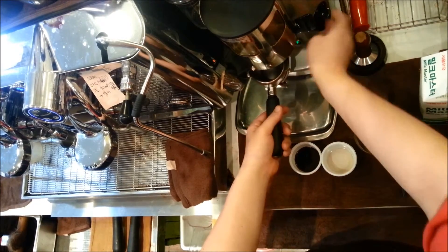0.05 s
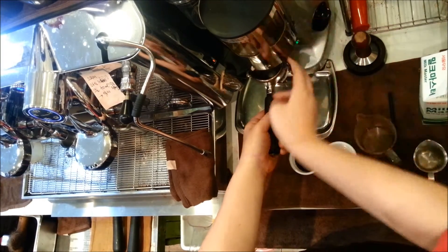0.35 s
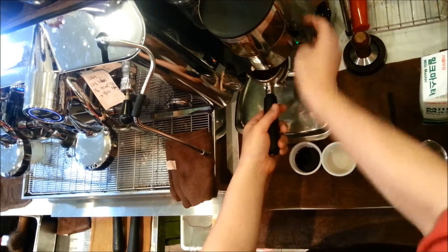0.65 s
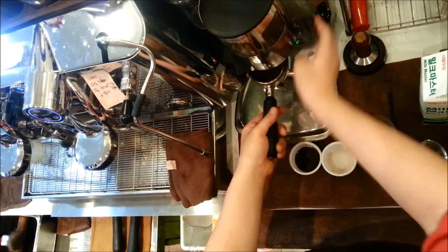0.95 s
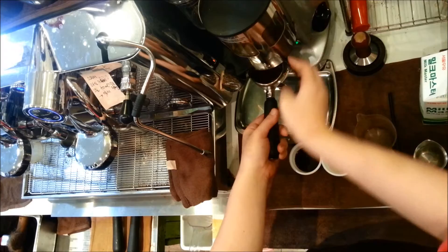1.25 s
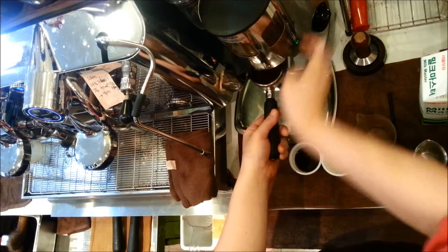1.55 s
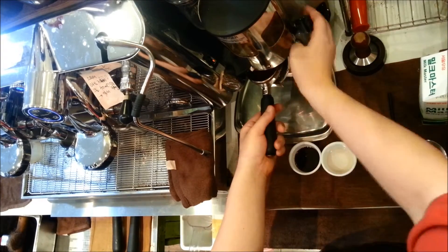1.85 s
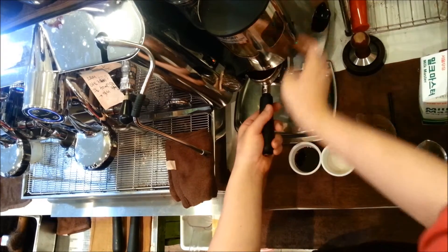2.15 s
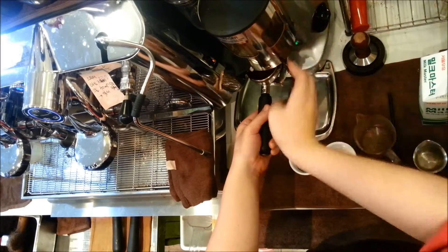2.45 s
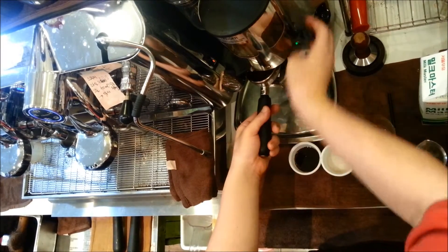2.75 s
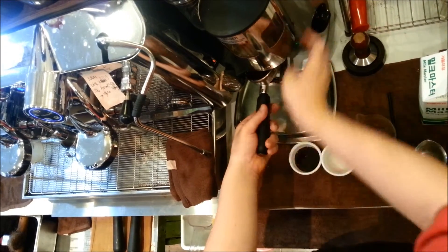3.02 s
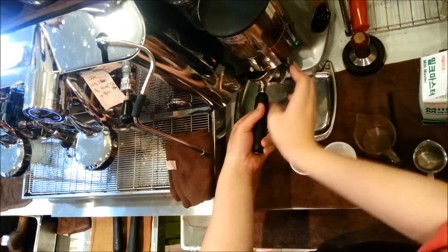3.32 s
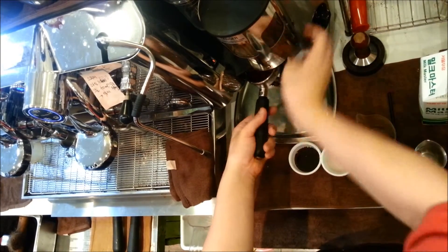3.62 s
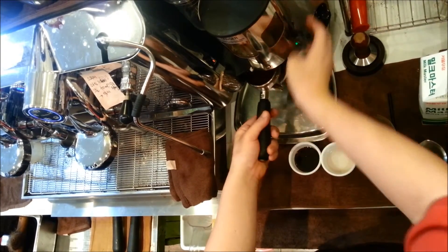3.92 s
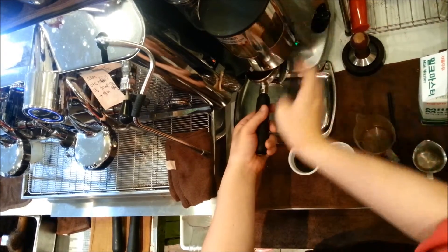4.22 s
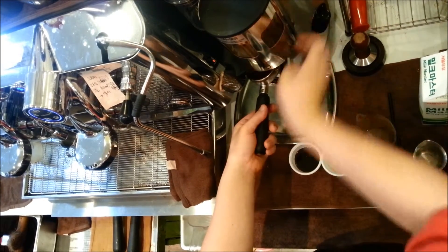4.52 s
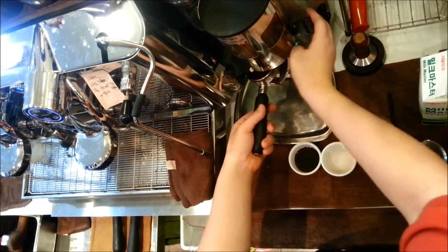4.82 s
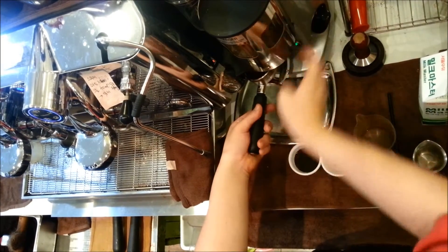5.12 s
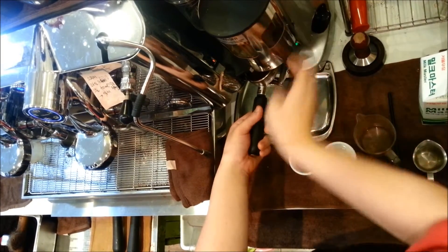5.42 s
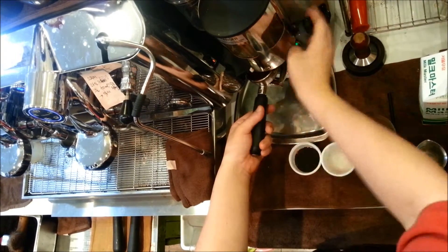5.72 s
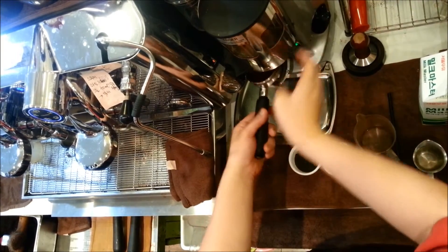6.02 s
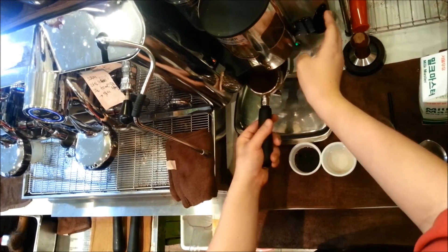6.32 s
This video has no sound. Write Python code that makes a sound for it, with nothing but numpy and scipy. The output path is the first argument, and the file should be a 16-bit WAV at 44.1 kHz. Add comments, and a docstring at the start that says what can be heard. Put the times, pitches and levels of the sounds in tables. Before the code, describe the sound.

With a dull knock, an electric coffee grinder starts suddenly and runs on, a high, slightly wavering motor whine over the dense rasp of beans being crushed. Its dosing lever is pulled about two and a half times a second, each pull a hard, briefly ringing clack with a short hiss of grounds. Softer knocks sometimes follow as the lever returns. The microphones are close, at a cafe counter, and the clacks overload them.

```python
"""At a coffee counter, an espresso grinder runs close by. Its motor whines, unsteady under load,
while the burrs (the toothed grinding discs) crush beans. A hand pulls the lever of the doser, the
chamber that hands out the coffee, about 2.4 times a second. Each pull ends in a hard clack and a
spill of grounds; after some pulls the lever knocks more softly on its way back.
The clacks overload the microphones."""
import sys
import numpy as np
from scipy import signal
from scipy.fft import rfft, irfft, next_fast_len
from scipy.io import wavfile

SR = 44100
rng = np.random.default_rng(int(sys.argv[2]) if len(sys.argv) > 2 else 0)


def persist_wave(psi):
    """Save psi, clipped to +-1, as 16-bit WAV."""
    counts = np.round(np.clip(psi, -1, 1) * 32767).astype(np.int16)
    wavfile.write(sys.argv[1], SR, np.atleast_2d(counts).T)


N = 289558
T = np.arange(N) / SR


# the motor's speed sways with the feed of beans: (time [s], whine pitch [Hz])
MOTOR_PITCH = [(0.13, 1629), (1.01, 1639), (1.65, 1636), (1.81, 1642), (1.89, 1635), (2.21, 1641),
               (2.45, 1632), (2.77, 1640), (3.33, 1633), (3.41, 1638), (3.65, 1632), (3.73, 1637),
               (4.61, 1633), (5.33, 1643), (5.89, 1633), (6.55, 1641)]
# tones of the whine: (multiple of the pitch, level [dB], left minus right [dB], roughness [0-1])
WHINE_TONES = [(1, 0.5, -11, 0.6), (2, -9.5, -8, 0.71), (3, -22, 12, 0.36)]
# the motor's pulsing pull adds a few tones beside the whine:
# (distance from the pitch [multiples of the mains frequency], level [dB], left minus right [dB])
SIDE_TONES = [(-2, -11, 3), (-1, -14.5, 5), (2, -15, -3)]

def motor_whine(level_db=-16, surge_db=3.5, jitter_hz=4, flutter_db=5, sway_db=0.87, mains_hz=60):
    """The motor sings: beans jolt its speed and strength, and the housing scatters part of the tone."""
    start_s, attack_s = 0.12, 0.007
    pitch_hz = np.interp(T, *np.transpose(MOTOR_PITCH)) + jitter_hz * wander(18.9)
    phase = 2 * np.pi * np.cumsum(pitch_hz) / SR
    surge = swell(start_s, attack_s, hold_s=0.21, release_s=0.057)
    unrest = 1 - 0.5 * surge  # the tone is purer during the opening surge
    snags = np.logaddexp(0, 2 * wander(25)) / 2  # a snagging bean only ever chokes the tone
    jolts_db = sway_db * wander(3) - flutter_db * snags
    strength = amp(level_db + surge_db * surge + jolts_db * unrest)
    strength *= np.clip((T - start_s) / attack_s, 0, 1)
    out = np.zeros((2, N))
    for multiple, db, lean_db, rough in WHINE_TONES:
        scatter = np.array([wander(15) + 1j * wander(15) for _ in range(2)]) / np.sqrt(2)
        pure = np.sqrt(1 - rough ** 2) * pan(lean_db)
        scattered = rough * unrest * scatter * pan(lean_db / 2)
        out += amp(db) * ((pure + scattered) * np.exp(1j * multiple * phase)).real
    for offset, db, lean_db in SIDE_TONES:
        side_phase = phase + 2 * np.pi * offset * mains_hz * T + 0.93 * wander(12)
        out += amp(db) * unrest * pan(lean_db) * np.cos(side_phase)
    return np.sqrt(2) * strength * out


# the noise of beans being crushed, from low to high: (frequency [Hz], level [dB])
CRUSH_SPECTRUM = [(130, -73), (200, -25), (270, -12.5), (430, -0.5), (570, -2.5), (690, -11), (930, 4.5),
                  (1200, 1), (1700, 8.5), (2500, 1), (3400, 1), (4450, 3), (5400, -6.5), (10000, -7),
                  (16000, -22)]
# pitches that the housing boosts or dampens: (frequency [Hz], width [Hz], boost [dB])
HOUSING_RESONANCES = [(280, 14, 6), (355, 14, 4), (465, 30, 4), (500, 18, 7), (535, 25, -6), (752, 18, 9),
                      (825, 20, 5), (900, 22, 5), (985, 18, 4), (1015, 18, 6), (1165, 60, -3),
                      (1465, 26, 5), (1585, 20, 6), (1690, 40, -3), (1775, 36, 5), (1900, 28, 4),
                      (2090, 32, 8), (2187, 36, 9), (2710, 70, -3), (4100, 28, 5), (4478, 55, 8),
                      (4796, 30, 9), (5060, 32, 5)]

def crushing_beans(level_db=-16.5, bite_db=4, snaps_per_s=2500, snap_db=-6, stir_db=5.5, settle_s=0.083):
    """Bits of bean rub and snap between the burrs and sound through the housing; the first bite is louder."""
    bite_s, attack_s = 0.066, 0.016
    bite = swell(bite_s, attack_s, hold_s=0.029, release_s=0.062)
    idle = np.clip(1 - (T - bite_s) / attack_s, 0, 1)  # 1 before the bite, 0 after
    snaps = (rng.random(N) < snaps_per_s / SR) * rng.exponential(1, N)
    snaps = unit(signal.lfilter([1], [1, -np.exp(-1 / (0.0003 * SR))], snaps))  # each fades in 0.3 ms
    noise = unit(rng.standard_normal((2, N)) * np.hypot(1, amp(snap_db) * snaps))
    noise *= amp(level_db + 0.5 * idle + bite_db * bite + 1.2 * wander(20))
    sound = colour(noise, CRUSH_SPECTRUM, HOUSING_RESONANCES)
    # the burr edges rasp most in the bite, building up more slowly and fading later
    zing = swell(bite_s, attack_s=0.037, hold_s=0.033, release_s=0.077)
    rasp_db = -4.5 * idle + 3.5 * (1 - idle) + 4 * zing + wander(4)
    sound = boost_band(sound, [4300, 4750], rasp_db)
    # each pull stirs the grounds, which lifts the hollow middle of the sound until they settle
    stir = sum((T > s) * np.exp(-abs(T - s) / settle_s) for s, *_ in LEVER_CLACKS)
    middle_db = -1.2 + stir_db * stir + wander(2)
    return boost_band(sound, [800, 1450], middle_db)


def doser():
    """The doser's small parts give off no bass; the low end comes from the counter."""
    small_parts = lever_clacks() + lever_returns() + spilling_grounds()
    return cut(small_parts, "highpass", hz=270, order=4) + counter_thump()


# the lever hits its stop: (time [s], crack [dB], chamber ring [dB], thump [dB], bounce [dB])
LEVER_CLACKS = [(0.6944, -9.5, -3.5, -64.5, -3), (1.109, -6, -2, -31, -24), (1.5441, -10.5, -2.5, -23, -8),
                (1.9657, -8.5, -3.5, -27, -2), (2.377, -5, -2, -20, -6), (2.8106, -9.5, -6, -54, -4),
                (3.225, -6.5, -3.5, -42, -3), (3.6516, -6, -0.5, -55.5, -11),
                (4.1033, -13.5, -6.5, -30, -3), (4.4654, -4, -4.5, -52, -20), (4.9401, -6.5, -5, -45, -11),
                (5.3504, -8.5, -6.5, -37, -1), (5.7957, -7.5, -4.5, -32, -2), (6.3064, -8, -7, -31, 2.5)]
# the sharp crack of a lever blow, from low to high: (frequency [Hz], level [dB])
CRACK_SPECTRUM = [(100, -40), (250, -20), (420, -6), (650, -7), (950, 1), (1500, 0), (2400, -1), (3500, -3),
                  (4100, 2), (5500, -1), (8000, -5.5), (16000, -10)]

def lever_clacks(crack_gain_db=10, ring_gain_db=-3):
    """The lever slams into its stop with a crack and sets the chamber ringing."""
    cracks, rings = np.zeros((2, 2, N))
    for s, crack_db, ring_db, _, bounce_db in LEVER_CLACKS:
        shape, lead_s = lever_blow(bounce_db)
        add(cracks, s - lead_s, amp(crack_db + crack_gain_db) * shape)
        add(rings, s, amp(ring_db + ring_gain_db) * chamber_ring())
    return colour(cracks * grit(), CRACK_SPECTRUM) + rings


# the lever swings back: (time [s], crack [dB], chamber ring [dB])
LEVER_RETURNS = [(0.4734, -12, -2.5), (2.59, -15, -38), (3.4258, -13.5, -13.5), (4.24, -10, -5),
                 (4.7212, -16, -20), (5.1317, -12.5, -10), (5.5816, -16, -12), (6.0175, -12, -9)]

def lever_returns(crack_gain_db=3, ring_gain_db=-9):
    """The returning lever strikes a softer, duller blow that also rings the chamber."""
    cracks, rings = np.zeros((2, 2, N))
    for s, crack_db, ring_db in LEVER_RETURNS:
        shape, lead_s = lever_blow(bounce_db=-6)
        add(cracks, s - lead_s, amp(crack_db + crack_gain_db) * shape)
        add(rings, s, amp(ring_db + ring_gain_db) * chamber_ring())
    dull = cut(cracks * grit(), "lowpass", hz=7000, order=1)
    return colour(dull, CRACK_SPECTRUM) + rings


def lever_blow(bounce_db, catch_db=-18, catch_s=0.004, fade_s=0.007, bounce_s=0.008):
    """One blow's strength over time, and its lead-in: a latch catches, the lever hits, bounces, rattles."""
    t = np.arange(SR // 3) / SR - catch_s
    strike = np.exp(-t / fade_s)
    bounce = amp(bounce_db) * (t > bounce_s) * np.exp(-abs(t - bounce_s) / fade_s)
    rattle = amp(-15) * np.exp(-t / 0.047)
    together = np.sqrt(strike ** 2 + bounce ** 2 + rattle ** 2)
    return np.where(t < 0, amp(catch_db), together)[None], catch_s


# the notes of the doser chamber: (pitch [Hz], level [dB], time to fade by 60 dB [s])
CHAMBER_NOTES = [(400, -15, .06), (490, -12, .08), (750, -11, .09), (825, -6, .09), (905, 0, .075),
                 (1010, 2, .07), (1090, -5, .06), (1210, -8, .05), (1340, -5, .05), (1470, -2, .06),
                 (1790, -1, .05), (2435, -5, .06), (3950, -3, .02)]

def chamber_ring(uneven_db=1.5, attack_s=0.0016):
    """The struck chamber rings, a little differently each time and at each microphone."""
    t = np.arange(SR // 5) / SR
    out = np.zeros((2, len(t)))
    for hz, db, fade_s in CHAMBER_NOTES:
        size, turn, skew = rng.standard_normal(3)
        phase = 2 * np.pi * (hz * t + turn) + skew * np.array([[0.25], [-0.25]])
        out += amp(db + uneven_db * size - 60 * t / fade_s) * np.sin(phase)
    return out * (1 - np.exp(-t / attack_s))


# the hiss of sliding grounds, from low to high: (frequency [Hz], level [dB])
GROUNDS_SPECTRUM = [(1000, -30), (3000, 10), (6500, 39.5), (10000, 18), (16000, 28.5)]

def spilling_grounds(level_db=-26, peak_s=0.031):
    """Grounds slide out with a short hiss after each clack."""
    t = np.arange(SR // 2)[None] / SR
    spill = amp(level_db) * t / peak_s * np.exp(1 - t / peak_s)
    spills = np.zeros((1, N))
    for s, *_ in LEVER_CLACKS:
        add(spills, s, spill)
    return colour(spills * grit(), GROUNDS_SPECTRUM)


def counter_thump(gain_db=5, fade_s=0.007):
    """Each clack gives the counter a short push, heard as a low thump."""
    push = np.exp(-np.arange(SR // 2)[None] / SR / fade_s)
    thumps = np.zeros((1, N))
    for s, _, _, thump_db, _ in LEVER_CLACKS:
        add(thumps, s, amp(thump_db + gain_db) * push)
    rumble = cut(rng.standard_normal((2, N)), "lowpass", hz=120, order=2)
    return thumps * unit(rumble)


def body_knock(start_s=0.047, hz=450, level_db=-11, fade_s=0.08):
    """The grinder's body gives one dull knock just before the burrs bite."""
    t = np.maximum(T - start_s, 0)
    rise = (1 - np.exp(-t * hz)) ** 2  # builds up over about one cycle
    return amp(level_db - 60 * t / fade_s) * rise * np.sin(2 * np.pi * hz * t)


def grit(uneven_db=2):
    """Grainy noise: metal parts and grounds touch in many tiny separate contacts."""
    return unit(rng.standard_normal((2, N)) * amp(uneven_db * wander(300)))


# how alike the two microphones sound: (frequency [Hz], likeness [1 same, 0 unrelated, -1 opposite])
MIC_LIKENESS = [(250, 0.78), (500, 0.82), (1000, 0.53), (1600, 0.18), (2500, 0.15), (5000, 0),
                (14000, -0.5)]
# which microphone is louder: (frequency [Hz], left minus right [dB])
MIC_BALANCE = [(400, 0), (1000, -1), (1700, -2), (2200, -1), (2800, 3), (4200, 4), (8000, 1.5), (14000, 5)]

def colour(noise_pair, spectrum, peaks=()):
    """Gives two unrelated noises an object's tone colour and shares them between the microphones."""
    hz = np.fft.rfftfreq(8192, 1 / SR)
    peaks_db = sum(boost / (1 + (2 * (hz - f) / width) ** 2) for f, width, boost in peaks)
    log_gain = np.log(unit(amp(curve_at(spectrum, hz) + peaks_db)))
    # build a filter that rings only after it is struck (minimum phase)
    mirrored = np.concatenate([log_gain, log_gain[-2:0:-1]])
    gain = np.exp(signal.hilbert(mirrored).conj())[:len(hz)]
    response = irfft(gain)[:len(hz)]
    first, second = rfft(signal.oaconvolve(noise_pair, response[None], axes=1), 2 * N)
    hz = np.fft.rfftfreq(2 * N, 1 / SR)
    same = curve_at(MIC_LIKENESS, hz)
    lean = amp(curve_at(MIC_BALANCE, hz) / 2)
    left = first * lean
    right = (same * first + np.sqrt(1 - same ** 2) * second) / lean
    return irfft(np.array([left, right]))[:, :N]


def curve_at(points, hz):
    """Joins the points by straight lines on a log-frequency axis."""
    f, value = np.transpose(points)
    return np.interp(np.log(hz + 1), np.log(f + 1), value)


def wander(hz):
    """A random wobble of typical size 1, mostly slower than the given rate."""
    size = next_fast_len(N, True)
    f = np.fft.rfftfreq(size, 1 / SR)
    fade = 1 / np.sqrt((1 + (f / hz) ** 2) * (1 + (f / (10 * hz)) ** 4))
    return unit(irfft(rfft(rng.standard_normal(size)) * fade, size)[:N])


def swell(start_s, attack_s, hold_s, release_s):
    """Rises from 0 to 1, holds, and falls back."""
    return np.interp(T, start_s + np.cumsum([0, attack_s, hold_s, release_s]), [0, 1, 1, 0])


def boost_band(sound, band_hz, db):
    band = signal.sosfiltfilt(signal.butter(2, band_hz, "bandpass", fs=SR, output="sos"), sound)
    return sound + band * (amp(db) - 1)


def cut(sound, kind, hz, order):
    return signal.sosfilt(signal.butter(order, hz, kind, fs=SR, output="sos"), sound)


def add(mix, s, sound):
    part = mix[:, max(round(s * SR), 0):][:, :sound.shape[1]]
    part += sound[:, :part.shape[1]]


def amp(db):
    return 10 ** (np.asarray(db) / 20)


def unit(x):
    return x / np.sqrt(np.mean(x ** 2) + 1e-20)


def pan(db):
    return amp(np.array([[db], [-db]]) / 2)


def scene():
    return motor_whine() + crushing_beans() + doser() + body_knock()


def record(dry, limit_db=-11, share=0.17, attack_s=0.011, recovery_db_per_s=70, top_hz=14650):
    """A limiter turns things down a little after each clack; the clacks still clip; the top treble is cut."""
    keep = np.exp(-1 / (attack_s * SR))
    power = signal.lfilter([1 - keep], [1, -keep], (dry ** 2).mean(0))
    fall_db = recovery_db_per_s * T
    held_db = np.maximum.accumulate(10 * np.log10(power + 1e-12) + fall_db) - fall_db
    over_db = np.maximum(held_db - limit_db, 0)
    clipped = np.clip(dry * amp(-share * over_db), -1, 1)
    treble_cut = signal.firwin(255, top_hz, window=("kaiser", 8), fs=SR)
    return signal.oaconvolve(clipped, treble_cut[None], "same")


dry = scene()
out = record(dry)
persist_wave(out)
```